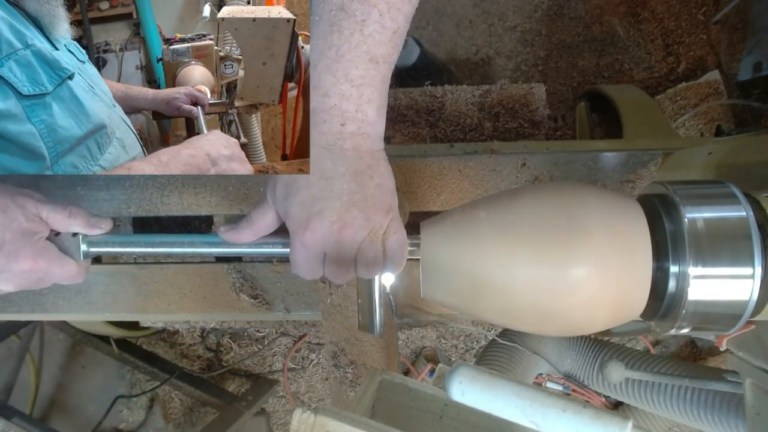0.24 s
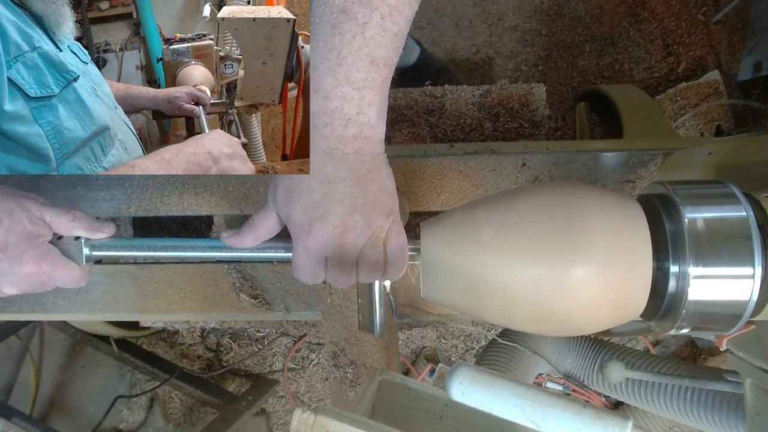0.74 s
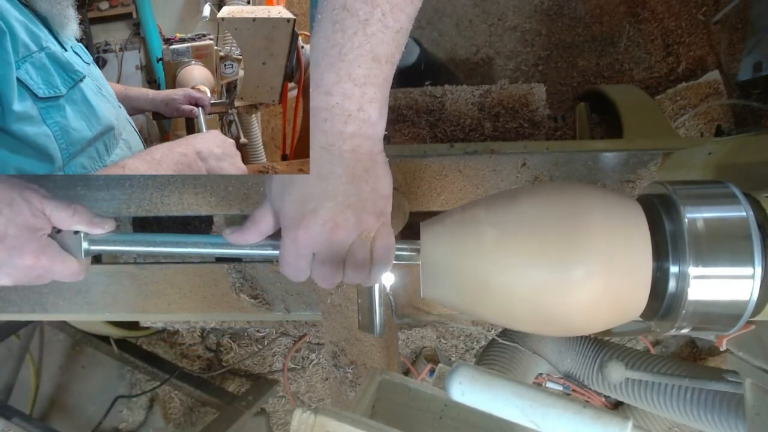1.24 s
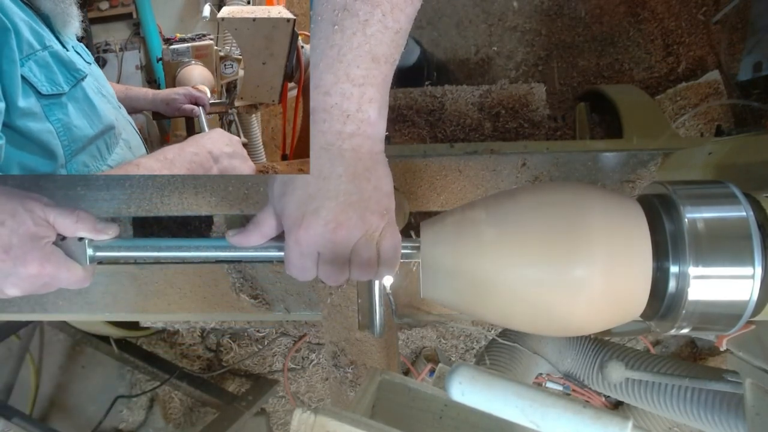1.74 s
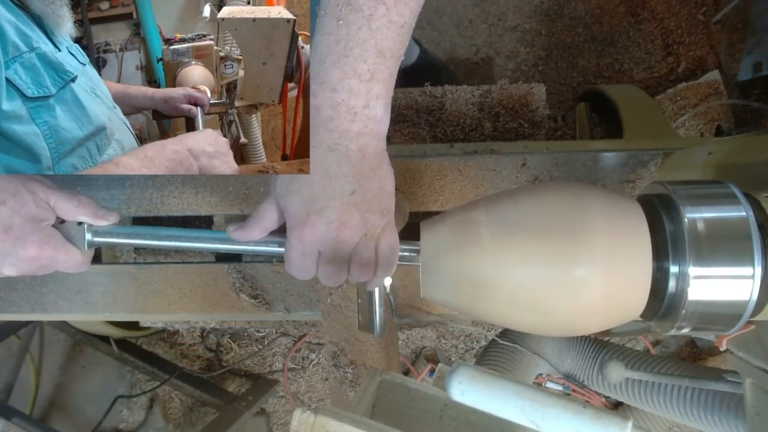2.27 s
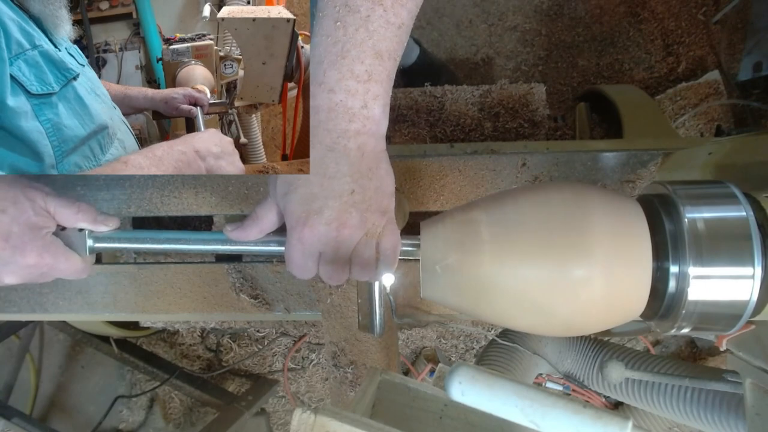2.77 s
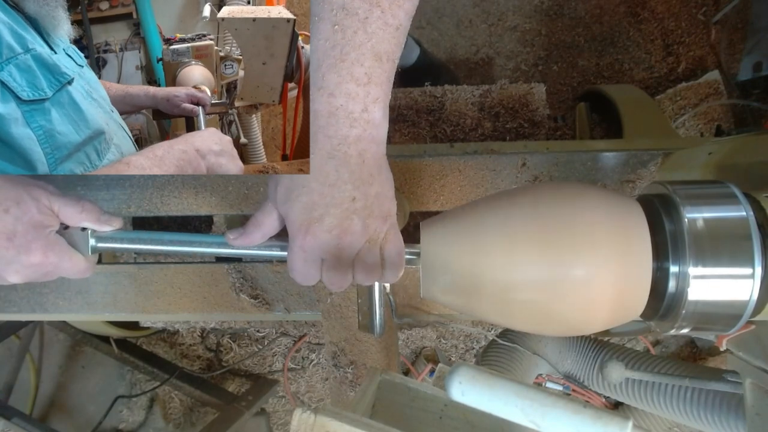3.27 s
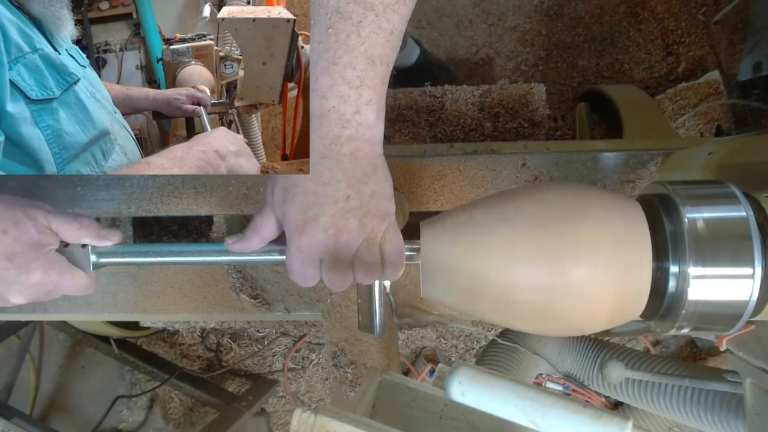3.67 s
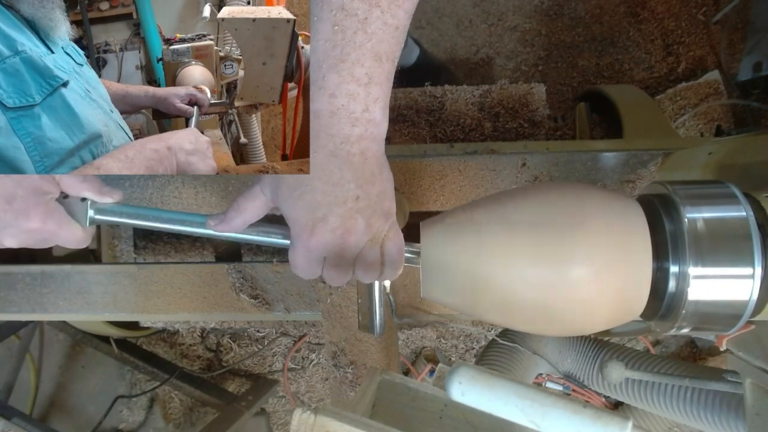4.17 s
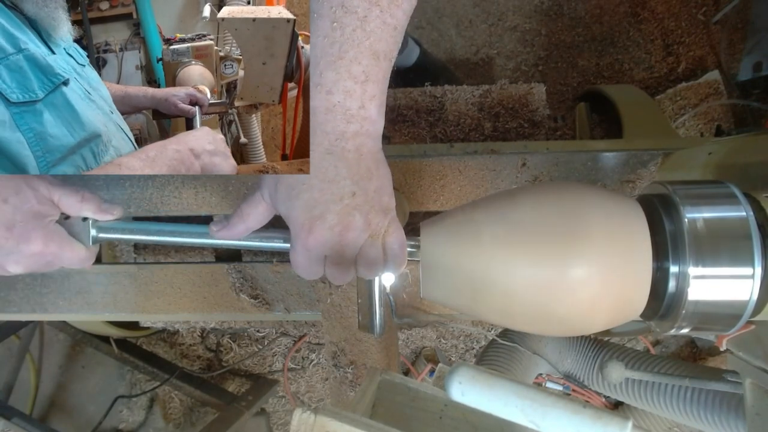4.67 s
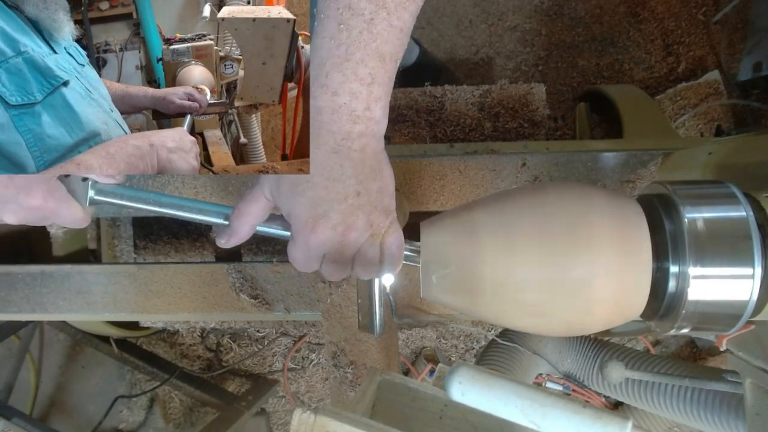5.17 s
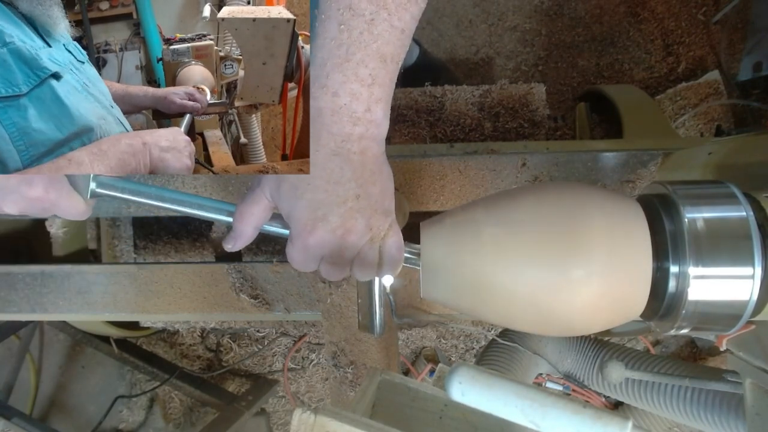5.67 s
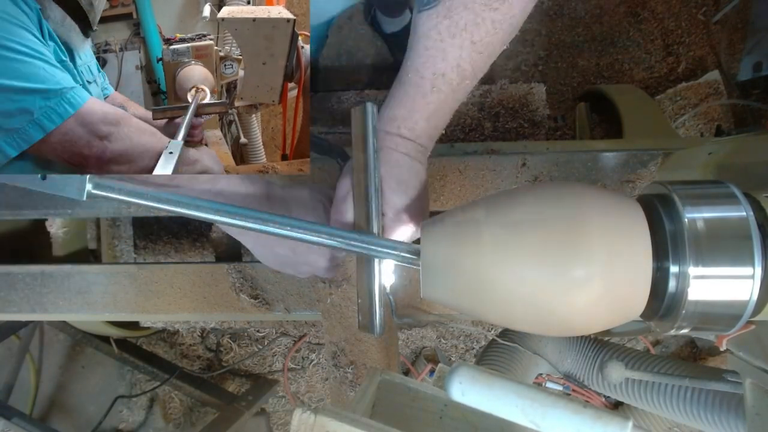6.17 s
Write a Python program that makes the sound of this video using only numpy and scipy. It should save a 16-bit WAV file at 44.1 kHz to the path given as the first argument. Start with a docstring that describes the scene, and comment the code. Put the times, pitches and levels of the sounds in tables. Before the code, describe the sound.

A lathe whirs with a wavering hum while a hollowing tool cuts inside a spinning wooden vase, heard close up in a small workshop. Six scraping passes surge as the edge digs in, mixing hissing chips, ringing steel and hollow wood resonance, with faint rubs between them and brief low shudders in the later ones. Near the end the tip touches twice, leaving only the running machine.

```python
"""A small workshop, a narrow-band stereo microphone near a lathe with a hollow wooden vase spinning on it.
A steel hollowing tool is already cutting: tearing fibres ring the tool bar, the thin wall and the hollow.
Five more passes follow, surging as the edge digs in, with light rubs and grazes between; in the last three
the tool judders. The gain drops under each cut, then a hum near 350 Hz, likely the air in the vase,
swells back over the lathe's weaker tones. The tip grazes twice more and the vase spins on untouched."""
import sys
import numpy as np
from scipy import signal
from scipy.fft import rfft, irfft, next_fast_len
from scipy.io import wavfile
from scipy.ndimage import uniform_filter1d, minimum_filter1d

SR = 44100
rng = np.random.default_rng(int(sys.argv[2]) if len(sys.argv) > 2 else 0)


def output_pcm(signal):
    """Save a mono or channel-first signal as 16-bit PCM at the path in sys.argv[1].

    Samples are clipped to [-1, 1] before scaling.
    """
    pcm = np.clip(np.atleast_2d(signal).T, -1, 1) * 32767
    wavfile.write(sys.argv[1], SR, np.round(pcm).astype(np.int16))


N = 282681
TIME = np.arange(N) / SR


def cutting():
    """One tearing force is heard as chip hiss and through cutter, bar, wall and hollow."""
    hiss, ring, roar = passes() * surges() + rubs() + grazes()
    force = tearing(snaps_per_s=3000, size_db=1.5, grain_s=0.00055, end_grain_db=0.87, clump_db=-0.2)
    chip_hiss = chips(force, hiss)
    steel = cutter(force * hiss) + bar(force * ring) + bar_sides(force * ring)
    # the wall lies between edge and cavity and follows both
    wood = wall(force * np.sqrt(hiss * roar)) + hollow(force * roar)
    return from_db(12) * (chip_hiss + steel + wood)


def tearing(snaps_per_s, size_db, grain_s, end_grain_db, clump_db, turns_hz=11):
    """Fibres snap at random, in clumps, and harder twice a turn where the edge meets end grain; rms 1."""
    turns = np.cumsum(turns_hz * (1 + 0.02 * drift(1.16))) / SR
    end_grain = np.cos(4 * np.pi * turns) + .5 * np.cos(2 * np.pi * turns)
    resistance = from_db(end_grain_db * end_grain + clump_db * drift(73))
    snapping = rng.random(N) < snaps_per_s / SR
    snaps = snapping * from_db(size_db * np.minimum(rng.exponential(1, N), 4))
    energy = signal.lfilter([1], [1, -np.exp(-1 / (grain_s * SR))], snaps ** 2 + 1e-18)
    # each snap reaches the two sides by different paths
    return rms_one(resistance * np.sqrt(energy) * rng.standard_normal((2, N)))


# the edge in the wood: (start [s], end [s], attack [s], hiss drive [dB], bar share [dB], hollow share [dB])
CUTTING_PASSES = [(-0.03, 0.338, .02, -28.5, 5.5, 5), (0.583, 1.131, .021, -22, 3, 4),
                  (1.368, 2.115, 0.019, -23, 0.5, 4.5), (2.411, 2.711, 0.037, -19.5, -0.5, 3.5),
                  (3.081, 3.775, 0.063, -27.5, 1, 5.5), (4.252, 4.913, 0.04, -27.5, -2, 8.5)]


def passes():
    """The edge is held in the wood, driving chips, bar and hollow."""
    return sum(shares(hiss_db, bar_db, hollow_db) * stroke(start, end, attack_s)
               for start, end, attack_s, hiss_db, bar_db, hollow_db in CUTTING_PASSES)


# changes in the depth of cut: (time [s], hiss change [dB], hollow change [dB], length [s])
DEPTH_SURGES = [(0.0, 6.5, 6, 0.018), (0.302, 11.5, 9, 0.034), (0.756, 4.5, 3, .035),
                (0.927, -4.5, -4, .02), (1, 3.5, 1, 0.015), (1.046, 4.5, 3, .03), (1.573, 3.5, 4.5, .022),
                (1.917, 7.5, 6, .035), (1.999, 6.5, 3, 0.022), (2.439, 6, 1.5, .02),
                (2.524, -5, -10.5, .014), (2.555, 3.5, 0.5, .016), (2.7, 5.5, -1, 0.0072),
                (3.151, 6, 7.5, .016), (3.238, 8, 5.5, 0.025), (3.294, -4, 1.5, .018),
                (3.376, 9, 9.5, 0.026), (3.432, -12, 1.5, 0.01), (3.509, 8, 4.5, 0.04),
                (3.654, -5, -11.5, 0.04), (3.73, 12.5, 8, 0.013), (4.321, 12.5, 3, 0.0045),
                (4.354, 5.5, 1.5, 0.011), (4.448, -1.5, -9.5, .022), (4.509, 15, 4, 0.012),
                (4.611, 5.5, 2, .025), (4.724, 12.5, 5.5, 0.028), (4.872, 10.5, 6, 0.051)]


def surges(bar_follows=0.26):
    """Gains as the edge digs deeper or eases off; the bar takes a share of the change in hiss."""
    change_db = sum(np.outer([hiss_db, bar_follows * hiss_db, hollow_db], bump(at, length))
                    for at, hiss_db, hollow_db, length in DEPTH_SURGES)
    return from_db(change_db)


# light contacts round the passes: (start [s], end [s], attack [s], hiss drive [dB])
TIP_RUBS = [(0.354, 0.426, .025, -48.5), (2.263, 2.416, 0.14, -36.5), (3.026, 3.11, 0.05, -43.5),
            (3.772, 3.829, 0.021, -32.5), (4.092, 4.172, 0.027, -38.5), (4.169, 4.282, 0.03, -45)]


def rubs():
    """The tip rubs lightly on its way in and out."""
    return sum(shares(hiss_db, bar_db=0.5, hollow_db=3) * stroke(start, end, attack_s)
               for start, end, attack_s, hiss_db in TIP_RUBS)


# brief touches: (time [s], hiss drive [dB], length [s], hollow share [dB], bar share [dB])
TIP_GRAZES = [(2.164, -32.5, 0.0052, -22, -16), (2.176, -35.5, 0.01, 3, 5.5), (5.242, -27, 0.0098, -0.5, 1),
              (5.517, -43.5, 0.0019, 16, -4.5)]


def grazes():
    """The tip touches the spinning wood for an instant."""
    return sum(shares(hiss_db, bar_db, hollow_db) * bump(at, length)
               for at, hiss_db, length, hollow_db, bar_db in TIP_GRAZES)


# breaking chips: (frequency [Hz], relative density [dB])
CHIP_SPECTRUM = [(200, -34.5), (600, -0.5), (1300, -3.5), (1800, -5), (2700, 2.5), (3300, -3.5),
                 (4500, -0.5), (5600, -1.5), (6700, -10), (7600, -12), (8400, -1.5)]


def chips(force, drive):
    """Chips break off in a broad hiss, to the right of the microphone."""
    hiss = coloured(force * drive, CHIP_SPECTRUM) * np.sqrt(np.mean(drive ** 2))
    return panned(hiss, pan_db=-4.5) * from_db(4.5)


# the cutter's modes: (frequency [Hz], width [Hz], relative level [dB], left over right [dB])
CUTTER_MODES = [(3837, 22, -2, 4), (4470, 45, 4.5, -14), (4880, 28, -7, -25), (5473, 110, 1.5, -18.5),
                (6050, 37, 0, -25), (6490, 50, 3.5, 1), (6987, 270, -5.5, -1), (7250, 158, 5, -2.5),
                (8190, 120, -7.5, 5)]


def cutter(force):
    """The steel cutter rings high under the snapping fibres."""
    return body(force, CUTTER_MODES, shift_db=0.24, shift_rate=27) * from_db(-1.3)


# the unbent bar's main ring: (frequency [Hz], width [Hz], relative level [dB], left over right [dB])
BAR_MODES = [(2634, 65, 1.5, -9.5), (2699, 55, 5, -7.5), (2851, 40, -4.5, 8.5)]
# the centre of that ring under load: (time [s], frequency [Hz])
BAR_BEND = [(0, 2640), (0.6, 2626), (1.38, 2633), (1.56, 2455), (1.77, 2603), (3.8, 2598), (4.2, 2770),
            (4.5, 2650), (4.95, 2654)]


def bar(force, centre_hz=2653, wander_hz=22):
    """The bar's ring bends with the load on its tip; the hand's pressure never holds quite still."""
    bent_hz = np.interp(TIME, *np.transpose(BAR_BEND)) + wander_hz * drift(6.4)
    return body(force, BAR_MODES, shift_db=2.0, shift_rate=11, tuning=bent_hz / centre_hz) * from_db(2.5)


# the bar's side rings: (frequency [Hz], width [Hz], relative level [dB], left over right [dB])
BAR_SIDE_MODES = [(2157, 51, -3.5, 3.5), (3892, 38, -2.5, -9.5), (7277, 70, -10, -5.5)]


def bar_sides(force):
    """The bar's weaker modes ring at a steady pitch."""
    return body(force, BAR_SIDE_MODES, shift_db=0.0, shift_rate=8.7) * from_db(-7.0)


# air in the vase and its heavy body: (frequency [Hz], width [Hz], relative level [dB], left over right [dB])
HOLLOW_MODES = [(145.4, 36, -14.5, 0.5), (359, 41, -7.5, 0), (495, 130, -14.5, -0.5), (571, 74, -6.5, 0.5),
                (649, 75, -9, 8.5), (701, 51, -7.5, 8), (773, 35.7, -3, 3.5), (969, 35, -4, -1),
                (1079, 69, -13, 1.5), (1187, 27, -11.5, 27), (1314, 73, -16.5, 9.5), (1536, 54, -12.5, -8),
                (1601, 22, -14.5, -12.5), (1762, 79, -13, 0)]


def hollow(force):
    """The hollow of the vase answers the cut with a low roar."""
    return body(force, HOLLOW_MODES, shift_db=2.5, shift_rate=4.16) * from_db(3.5)


# the thin wall: (frequency [Hz], width [Hz], relative level [dB], left over right [dB])
WALL_MODES = [(1980, 38, -2.5, 0), (2087, 69, 2, 2.5), (2216, 60, -1.5, 0), (2400, 48, 3.5, -12)]


def wall(force):
    """The thin wooden wall rings above the hollow."""
    return body(force, WALL_MODES, shift_db=2.5, shift_rate=2.8) * from_db(-1.9)


# shudders at the tool rest: (time [s], level [dB], length [s])
REST_JUDDERS = [(2.478, -21.5, 0.061), (3.189, -7.5, 0.026), (4.345, -11, 0.027)]


def judder(hz, width_hz):
    """The tool shakes on its rest in short, dull bursts."""
    shake = sum(from_db(level_db) * bump(at, length) for at, level_db, length in REST_JUDDERS)
    rumble = resonate(rng.standard_normal((2, N)), hz, width_hz)
    return shake * rms_one(resonate(rumble, hz, width_hz))


# swells of the hum: (time [s], gain [dB], length [s])
VASE_HUM_SWELLS = [(1.28, 13.5, 0.037), (4.086, 7.5, 0.061), (5.466, 7.5, 0.028), (5.904, 1.5, 0.095)]


def vase_hum():
    """A wavering hum near 350 Hz, likely air in the spinning vase's hollow."""
    swell_db = sum(gain_db * bump(at, length) for at, gain_db, length in VASE_HUM_SWELLS)
    return from_db(-25 + swell_db) * hum_line(hz=351.5, width_hz=13.24, waver_db=3.0)


# tones of motor, frame and drive: (frequency [Hz], width [Hz], level [dB])
LATHE_TONES = [(127.3, 14, -34.5), (243.3, 13, -41.5), (441.5, 18.14, -34.5), (658, 29, -32),
               (1177, 37, -43), (2420, 71, -47.5), (6340, 17, -51.5), (6478, 16, -64)]


def lathe_tones():
    """Motor and frame drone weakly and the drive whines."""
    return sum(from_db(level_db) * hum_line(hz, width, waver_db=1.6) for hz, width, level_db in LATHE_TONES)


# the whirr behind the cut: (frequency [Hz], relative density [dB])
WHIRR_SPECTRUM = [(12, -51), (20, -4), (156, -13), (233, -9.5), (278, -17), (348, -7), (405, -15.5),
                  (437, -5.5), (508, -16.5), (652, -17.5), (739, -19), (1220, -22.5), (2720, -34.5),
                  (6380, -41), (8000, -48), (10400, -81.5), (17600, -120)]
# its slow rise and fall: (time [s], gain [dB])
WHIRR_GAIN = [(0, 1.5), (4.0, -0.5), (5.1, 0.5), (5.6, -2), (6.4, -0.9)]


def lathe_whirr(flutter_db):
    """Motor fan, belt and the air round the spinning vase make a fluttering rush."""
    level_db = -20.5 + np.interp(TIME, *np.transpose(WHIRR_GAIN)) + flutter_db * drift(40)
    return from_db(level_db) * coloured(rng.standard_normal((2, N)), WHIRR_SPECTRUM)


def workshop(x, wet_db, t60_s):
    """The direct sound and the small room's reflections: eight short feedback echoes a side."""
    echoes = np.zeros((2, N))
    for k, lag in enumerate((rng.uniform(.008, .035, 16) * SR).astype(int)):
        side = k % 2
        loop = x[side].copy()
        feedback = from_db(-60 * lag / SR / t60_s)
        for i in range(lag, N, lag):
            loop[i:i + lag] += feedback * loop[i - lag:i][:N - i]
        echoes[side] += (loop - x[side]) * (-1) ** (k // 2)
    return x + from_db(wet_db) * echoes


def hum_line(hz, width_hz, waver_db):
    """A tone whose wandering pitch and level widen it; rms 1."""
    wandering_hz = hz + .5 * width_hz * np.array([drift(19.6), drift(19.65)])
    tone = np.sin(2 * np.pi * np.cumsum(wandering_hz, axis=1) / SR)
    return rms_one(tone * from_db(waver_db * drift(15)))


def body(force, modes, shift_db, shift_rate, tuning=1):
    """Modes rung by a force, keeping its power; their shares shift as the contact point travels."""
    out, power = 0, 0
    for k, (hz, width, level_db, pan_db) in enumerate(modes):
        share = from_db(level_db + shift_db * drift(shift_rate))
        out = out + (-1) ** k * panned(resonate(force * share, hz * tuning, width), pan_db)
        power += np.mean(share ** 2) * np.pi * width / SR
    return out / np.sqrt(power)


def resonate(x, hz, width_hz):
    """One resonance with gain 1 on top; its centre may move."""
    r = np.exp(-np.pi * width_hz / SR)
    if np.ndim(hz):
        turn = np.exp(2j * np.pi * np.cumsum(hz) / SR)
        return 2 * np.real(turn * signal.lfilter([1 - r], [1, -r], x * turn.conj() + 1e-18))
    feedback = [1, -2 * r * np.cos(2 * np.pi * hz / SR), r * r]
    return signal.lfilter(np.array([1, 0, -1]) * (1 - r * r) / 2, feedback, x + 1e-18)


def coloured(x, spectrum):
    """Give a signal a smooth spectrum; rms 1."""
    hz, level_db = np.transpose(spectrum)
    size = next_fast_len(N)
    log_hz = np.log(np.fft.rfftfreq(size, 1 / SR) + 1)
    gain = from_db(np.interp(log_hz, np.log(hz), level_db))
    return rms_one(irfft(rfft(x, size) * gain, size)[:, :N])


def stroke(start, end, attack_s, release_db_per_s=745.5):
    """The tip is eased on, held, and its sound dies as it lifts."""
    onset = np.clip((TIME - start) / attack_s, 0, 1) ** 2
    return onset * from_db(-release_db_per_s * np.maximum(TIME - end, 0))


def bump(at, length):
    """A bell-shaped swell of height 1."""
    return np.exp(-.5 * ((TIME - at) / length) ** 2)


def shares(hiss_db, bar_db, hollow_db):
    """Gains of one contact on chips, bar and hollow."""
    return from_db(hiss_db + np.array([[0], [bar_db], [hollow_db]]))


def drift(rate_hz):
    """A slow random wander; rms 1."""
    r = np.exp(-40 * np.pi * rate_hz / SR)
    slow = signal.lfilter([1], [1, -2 * r, r * r], rng.standard_normal(N // 20 + 3002))[3000:]
    return np.interp(np.arange(N) / 20, np.arange(len(slow)), rms_one(slow))


def panned(x, pan_db):
    """Left louder than right by pan_db, at equal total power."""
    return x * rms_one(from_db([[pan_db / 2], [-pan_db / 2]]))


def from_db(db):
    """Decibels to gain."""
    return 10 ** (np.asarray(db) / 20)


def rms_one(x):
    """Scale to unit rms."""
    return x / np.sqrt(np.mean(x ** 2) + 1e-20)


def gain_control(x, threshold_db, release_db_per_s, slope, start_db):
    """Loud sound pulls the gain down quickly; it creeps back afterwards."""
    power = uniform_filter1d(np.mean(x ** 2, axis=0), size=1500)
    over_db = np.maximum(10 * np.log10(np.maximum(power, 1e-12)) - threshold_db, 0)
    fall_db = release_db_per_s * TIME
    held_db = np.maximum(np.maximum.accumulate(over_db + fall_db), start_db) - fall_db
    return x * from_db(-slope * uniform_filter1d(held_db, size=600))


def limiter(x, ceiling):
    """The gain ducks for a millisecond or two round peaks above the ceiling."""
    gain = np.minimum(1, ceiling / np.maximum(np.abs(x), 1e-9))
    return x * uniform_filter1d(minimum_filter1d(gain, size=61, axis=1), size=61, axis=1)


def overload(x, top, hardness):
    """Peaks are rounded off as they near the top."""
    return x / (1 + np.abs(x / top) ** hardness) ** (1 / hardness)


def scene():
    """The cut close by with a trace of the room, the hum and the running lathe behind it."""
    cut = workshop(cutting(), wet_db=-28.0, t60_s=0.17)
    return cut + judder(hz=126.0, width_hz=110) + lathe_whirr(flutter_db=1.0) + vase_hum() + lathe_tones()


def record(dry):
    """Gain control, a narrow microphone band, and a limiter that lets the highest peaks just overload."""
    levelled = gain_control(dry, threshold_db=-16.0, release_db_per_s=25, slope=0.59, start_db=20)
    narrow = signal.sosfilt(signal.butter(28, 7895, fs=SR, output="sos"), levelled)
    limited = limiter(narrow, ceiling=1.12)
    rounded = overload(limited, top=3.2, hardness=3.6)
    return signal.sosfilt(signal.cheby2(12, 70, 16000, fs=SR, output="sos"), rounded)


dry = scene()
out = record(dry)
output_pcm(out)
```